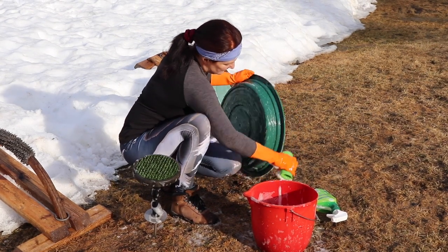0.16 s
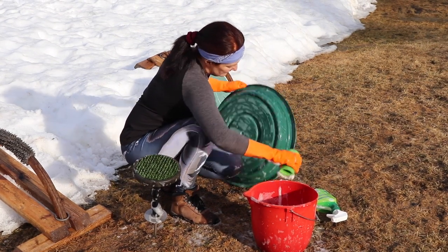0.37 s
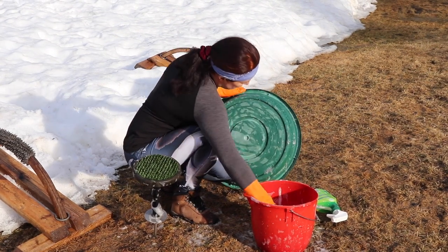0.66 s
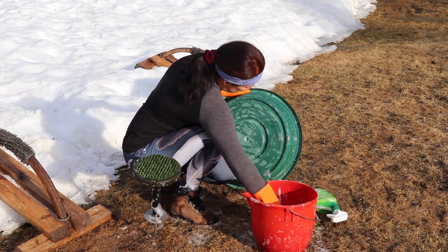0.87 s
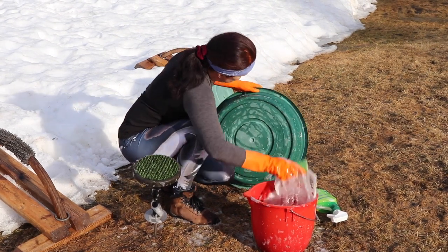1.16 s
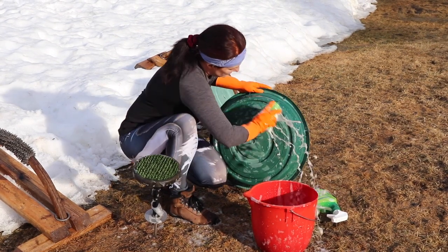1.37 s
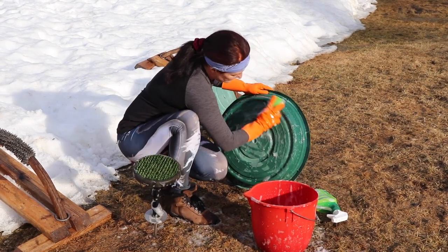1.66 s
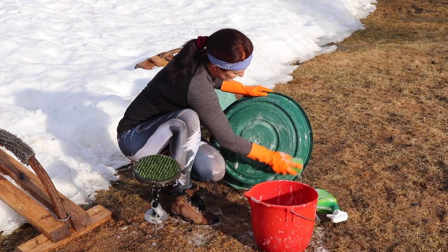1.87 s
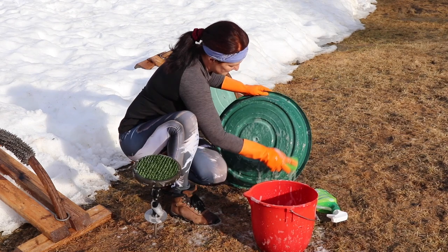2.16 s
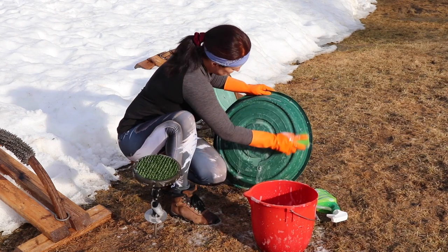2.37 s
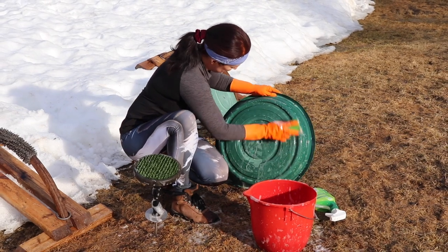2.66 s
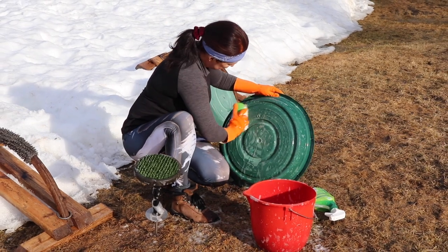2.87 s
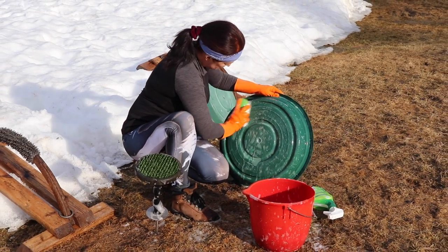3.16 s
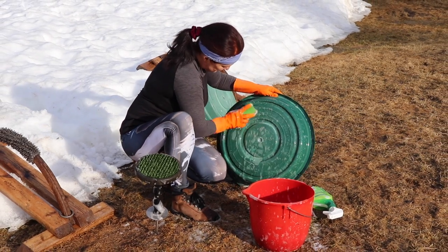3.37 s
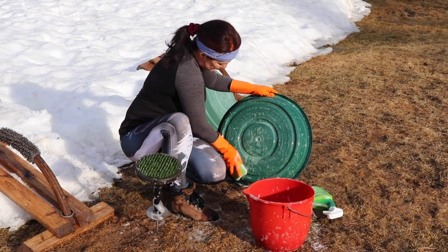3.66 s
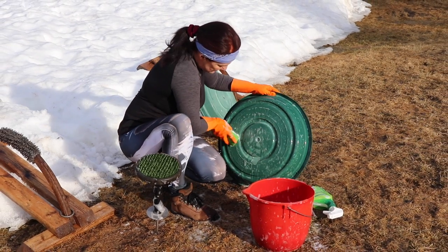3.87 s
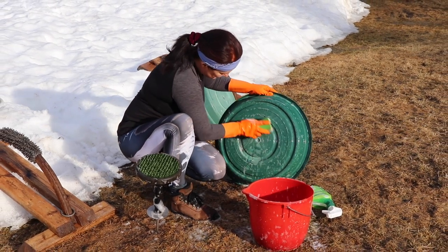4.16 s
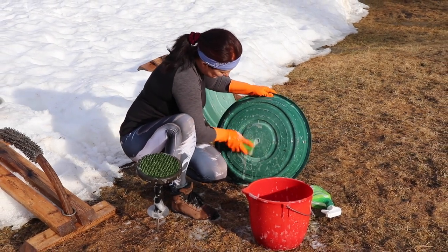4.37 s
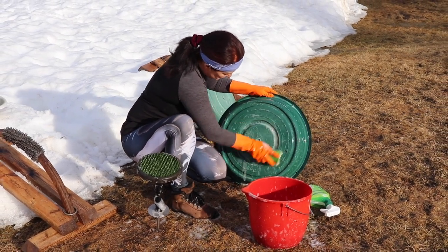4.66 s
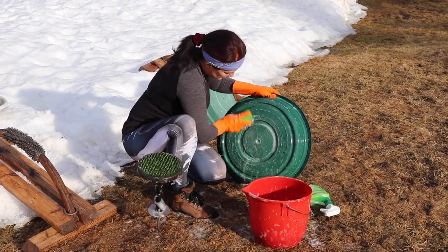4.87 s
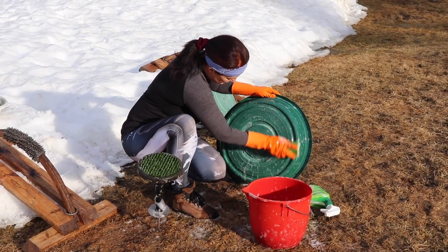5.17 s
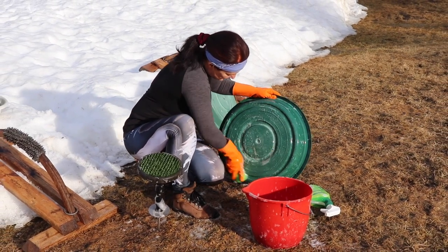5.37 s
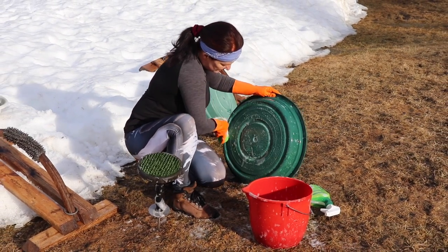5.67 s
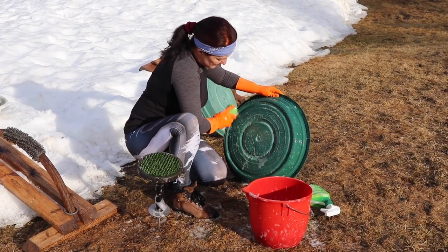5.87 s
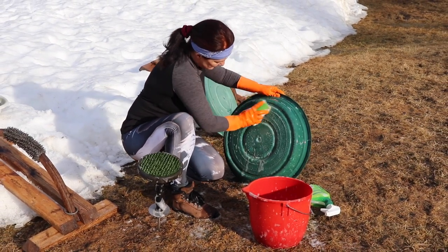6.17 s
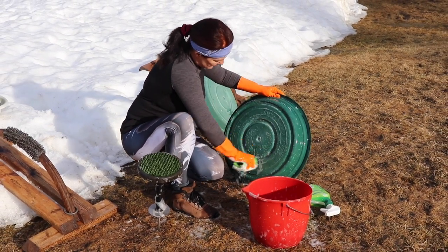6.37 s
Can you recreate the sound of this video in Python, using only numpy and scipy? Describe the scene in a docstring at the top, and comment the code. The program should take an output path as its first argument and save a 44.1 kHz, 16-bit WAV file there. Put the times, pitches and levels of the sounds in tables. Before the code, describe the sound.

A plastic pan scrapes over gritty ground, a scrubber is dunked and lifted streaming from a bucket, then quick bristly strokes rasp and drum outdoors.

```python
"""Scrubbing a plastic pan outdoors

A big pan scrapes round on its rim (grit noise, rim resonances) and settles with knocks (decaying modes).
A scrubber is dunked and lifted out streaming: bubbles, filtered splash grains, low plops and spatters.
Quick strokes follow, grains shaped into bristle rasp and suds hiss, while the pan's modes drum.
A small bird trills twice and others twitter far off in gliding sines; filtered noise makes light wind,
and open-country air with a haze of distant birdsong."""
import sys
import numpy as np
from scipy import signal
from scipy.io import wavfile
from scipy.ndimage import uniform_filter1d

SR = 44100
rng = np.random.default_rng(int(sys.argv[2]) if len(sys.argv) > 2 else 0)


def output_pcm(signal):
    """Save a mono or channel-first signal as 16-bit PCM at the path in sys.argv[1].

    Samples are clipped to [-1, 1] before scaling.
    """
    pcm = np.clip(np.atleast_2d(signal).T, -1, 1) * 32767
    wavfile.write(sys.argv[1], SR, np.round(pcm).astype(np.int16))


N = 287952

# Relative levels colour a layer; levels marked "pre-trim" pass through a fixed gain in their function.

# open-country air, with a haze of distant birdsong near 4.5 kHz: f/Hz, relative level per Hz/dB
AIR_AND_BIRD_HAZE_SPECTRUM = [(59, -43.5), (100, -16.5), (121, -14), (135, -12), (502, -17), (583, -14.5),
                              (662, -19.5), (1170, -16.5), (2860, -25), (4020, -27.5), (4570, -16.5),
                              (5420, -29), (5900, -29), (6420, -31.5), (16000, -37.5)]
# wind rumble on the microphone: f/Hz, relative level per Hz/dB
RUMBLE_SPECTRUM = [(18, -16), (30, -9), (46, -5.5), (72, -7.5), (105, -39)]
# gusts: t/s, length/s, level/dB, top of the rumble f/Hz
GUSTS = [(.52, 0.166, -43, 50), (2.4, .085, -49, 100), (4.68, 0.117, -46.5, 110),
         (5.765, 0.105, -35.5, 110), (6.039, 0.168, -40, 80), (6.169, 0.148, -31.5, 90),
         (6.3, 0.213, -44.5, 90)]
# gust envelope: attack/s, growth from start to end/dB, arch in the middle/dB, release/s
GUST_SHAPE = (.02, -3.5, 1.5, .05)
AIR_AND_BIRD_HAZE_DB, BREEZE_DB = -53.5, -57

# one syllable, a flick and then a rising whistle: t from its middle/s, f/Hz, relative level/dB
SYLLABLE = [(-.032, 4000, -35), (-.03, 4400, -8), (-.026, 5500, -6), (-.0245, 5800, -10),
            (-.0235, 5900, -45), (-.0225, 3450, -40), (-.02, 3650, -15), (-.009, 4200, -8),
            (-.002, 4500, 0), (.008, 4830, 0), (.015, 5100, -5), (.02, 4850, -13), (.024, 4700, -35)]
# near bird's trills: t/s, length/s, first gap between syllables/s, loudest t/s, level/dB
TRILLS = [(0.121, 1.8, .0677, .92, -42.5), (5.668, .45, .0700, 5.588, -41.5)]
# further bird's downward slurs: t/s, starting f/Hz, final f/Hz, level/dB
SLURS = [(2.275, 5900, 5370, -54), (5.902, 5200, 3700, -49.5), (5.963, 6200, 5670, -61.5),
         (6.038, 6100, 5640, -63.5), (6.108, 5000, 3460, -57), (6.116, 6000, 5500, -68)]
TRILL_SLOWS_S = .00036  # added to each gap in turn
TRILL_ARCH_DB_PER_S2 = 16.5  # the level falls away either side of the loudest moment

# splash of stirred water: f/Hz, relative level per Hz/dB
SPLASH_SPECTRUM = [(210, -45), (350, -0.5), (455, -9.5), (834, -4), (1530, -7.5), (2010, -8), (3600, -20.5),
                   (4680, -54), (7920, -120)]
# fine spray: f/Hz, relative level per Hz/dB
SPRAY_SPECTRUM = [(2000, -2.5), (3500, -0.5), (6000, -6.5), (9000, -11.5), (15500, -17.5)]
# stirring in the bucket, then streaming back: t/s, level/dB
FLOW = [(.12, -53.5), (.25, -70.5), (.42, -61.5), (.56, -48.5), (.66, -65.5), (.9, -52.5), (1.2, -43.5),
        (1.4, -49), (1.66, -45.5)]
# water squeezed or flung from the scrubber: t/s, length/s, level/dB
SPRAYS = [(.27, .21, -55), (.48, .09, -50), (.72, 0.088, -58), (1.53, .14, -47)]
# spray envelope: attack/s, growth from start to end/dB, arch in the middle/dB, release/s
SPRAY_SHAPE = (.02, -1.2, 1.5, .04)
# plops and bumps in the bucket: t/s, pre-trim level/dB, f/Hz, splash level/dB
PLOPS = [(0.521, -31, 280, -42), (0.82, -29.5, 335.6, -35), (0.859, -32, 315, -52),
         (0.974, -36.5, 327, -40), (1.196, -17, 281.6, -31.5), (1.249, -28.5, 279, -37.5),
         (1.345, -28.5, 321.2, -32), (1.392, -35.5, 344, -37), (1.452, -39, 338, -48.5),
         (1.493, -36, 326.5, -42), (1.531, -29, 234, -57)]
# wet spatters and drops: t/s, pre-trim smack level/dB, pre-trim fizz level/dB, starting drop f/Hz
SPATTERS = [(0.4799, -39, -55.5, 1450), (0.52, -33.5, -40, 1338), (0.5259, -37.5, -32, 1710),
            (0.5687, -43, -50.5, 3284), (0.7403, -50, -63.5, 1050), (0.9781, -40.5, -59, 1520),
            (1.005, -51, -61, 1045), (1.156, -34, -66, 1900), (1.2306, -40, -55, 1140),
            (1.3059, -39, -59, 1227), (1.329, -39, -43, 1036), (1.4674, -36, -35.5, 2036),
            (1.5291, -42, -39.5, 1550), (1.596, -37.5, -42, 3900), (1.618, -32, -30, 2460),
            (2.226, -55, -49, 3800), (2.259, -56, -49, 4200), (2.412, -37, -33, 2400),
            (2.423, -40, -36, 1300)]
GURGLE_DB, GURGLE_DB_PER_FLOW_DB = -42.5, 1.4  # bucket's hollow at full flow, and how it follows the flow
MIST_DB = -12.5  # fine spray against the splash

# body of the pan: f/Hz, relative level/dB, t60/s
PAN_MODES = [(96.2, -1.5, 0.105), (116.6, -7, 0.157), (137.1, -4.5, 0.149), (176.1, -1, 0.0696),
             (208.77, -3.5, 0.1814), (256, -4.5, 0.0713), (288.75, -3.5, 0.1113), (339.1, -3, 0.054),
             (394.3, -5, 0.101), (516, 2.5, 0.0365)]
# stiff rim and ribs of the pan: f/Hz, relative level/dB, t60/s
RIM_MODES = [(619.8, -4, 0.04), (844, -1, 0.058), (1006, -2.5, 0.0158), (1077, -1.5, 0.0616),
             (1240, 2.5, 0.0242), (1757, 0.5, 0.026), (2434, 4, 0.0177), (2687, -8, 0.065),
             (2839, 0.5, 0.0595), (3184, -8.5, .04), (3936, 3.5, 0.0135)]
# rim dragged over gritty ground: t/s, pre-trim level/dB
DRAG = [(0, -18), (.012, -21.5), (.02, -24.5), (.038, -19), (.049, -28), (.056, -26), (.07, -50),
        (.11, -52), (.15, -54.5)]
# gritty scrape: f/Hz, relative level per Hz/dB
GRIT_SPECTRUM = [(210, -54), (350, -25), (523, 2), (601, -9.5), (1260, -2.5), (1540, -28.5), (1660, -24.5),
                 (2100, -7), (2520, -12.5), (3040, -11.5), (4330, -21.5), (5990, -36.5), (14000, -43)]
# blows on the pan: t/s, pre-trim thud level/dB, thud f/Hz, pre-trim slap level/dB
KNOCKS = [(0.026, -12, 215.4, -38), (0.074, -15.5, 190, -30.5), (2.07, -28.5, 250, -60.5),
          (2.412, -19, 156.8, -27.5), (2.423, -26, 202.4, -30), (2.476, -20, 213, -45),
          (2.721, -15, 280, -36), (2.78, -14, 255, -32), (2.8, -17, 262, -42), (2.877, -26.5, 212, -40.5),
          (3.222, -23, 283, -39), (3.386, -38, 172, -29), (3.749, -14.5, 260, -27.5), (3.78, -20, 290, -36),
          (4.141, -24.5, 205, -33), (4.354, -18.5, 269.4, -35.5), (4.425, -18.5, 191.8, -31.5),
          (4.553, -23, 164, -43), (4.716, -20, 117, -28), (4.728, -21, 101, -37.5),
          (4.923, -35.5, 102, -30.5), (4.973, -15.5, 182.5, -32.5), (4.995, -17, 191.8, -27.5),
          (5.311, -24.5, 207, -33.5), (5.394, -20.5, 223, -28.5), (6.186, -26, 173, -35),
          (6.313, -15, 183, -43.5)]

# bristle rasp: f/Hz, relative level per Hz/dB
RASP_SPECTRUM = [(240, -11.5), (400, -6.5), (527, -3.5), (782, 1), (1370, -4), (1590, -1.5), (2620, -6),
                 (4390, -3), (5990, -21), (7000, -18.5), (9100, -48), (15400, -120)]
# suds hiss: f/Hz, relative level per Hz/dB
SUDS_SPECTRUM = [(1650, -18.5), (2800, -9.5), (4400, -1.5), (5980, -7.5), (8300, -5), (11000, -16.5),
                 (12900, -1), (15100, -17.5), (16000, -22)]
# scrubber strokes: t/s, length/s, pre-trim rasp, suds and drumming level/dB each, rasp colour f/Hz, drumming f/Hz
STROKES = [(1.64, 0.208, -35, -45, -38.5, 1362, 248), (1.692, 0.3427, -37.5, -40.5, -55, 1600, 221),
           (1.919, 0.2706, -42.5, -45, -42.5, 1800, 278), (2.455, 0.103, -31.5, -36.5, -31, 1190, 217),
           (2.473, 0.1666, -43, -40.5, -43, 1380, 212), (2.6, 0.24, -44.5, -45, -42.5, 1190, 291),
           (2.707, 0.1917, -31, -45.5, -28.5, 1050, 265), (2.774, 0.1947, -34, -39.5, -36.0, 1070, 241),
           (2.865, 0.205, -38.5, -39.5, -43, 1330, 249), (3.044, 0.178, -33, -34.5, -33, 1620, 196),
           (3.193, 0.188, -35, -36.5, -35.5, 1210, 247), (3.36, 0.1359, -30, -34.5, -29, 1500, 223),
           (3.469, 0.222, -36.5, -40, -33.5, 1380, 228), (3.557, 0.215, -31, -38, -35, 1520, 219.5),
           (3.692, 0.2004, -34.5, -39.1, -28, 1400, 273.5), (3.827, 0.1957, -38.5, -39.5, -35, 1780, 254),
           (3.971, 0.1924, -33, -40, -35.5, 1506, 238.4), (4.089, 0.18, -35, -43, -37, 1120, 207),
           (4.198, 0.197, -35.5, -42.5, -37, 1090, 177), (4.284, 0.1978, -31.5, -39.5, -35, 1330, 278),
           (4.404, 0.2104, -37.5, -42.5, -39, 1204, 216), (4.515, 0.2464, -33, -39, -33.0, 1250, 210),
           (4.654, 0.17, -34.5, -44.5, -32.5, 1053, 195), (4.718, 0.2334, -36.5, -40, -33, 1335, 230),
           (4.899, 0.302, -36.5, -41.5, -35, 1250, 184), (5.07, 0.2587, -34.5, -40.5, -39.5, 1400, 216),
           (5.234, 0.222, -38.0, -39.0, -39.5, 1460, 254), (5.342, 0.2997, -37.5, -42, -33, 1230, 271.3),
           (5.53, 0.25, -36, -44.5, -41.5, 1450, 258.4), (5.676, 0.2074, -42.5, -45.5, -49.5, 1710, 290),
           (6.167, 0.1626, -37.5, -48, -36.5, 1432, 183), (6.263, 0.2344, -33.5, -40, -30.5, 1240, 197),
           (6.403, 0.1102, -27.5, -29.5, -29, 1350, 216)]
# stroke envelopes: attack/s, growth from start to end/dB, arch in the middle/dB, release/s
RASP_SHAPE = (0.0412, 2.52, 0.86, 0.1093)
SUDS_SHAPE = (0.0517, 1.66, 6.5, 0.0925)
DRUM_SHAPE = (0.0038, -0.77, 3, 0.0862)
# wander of the drumming pitch as the scrubber crosses the ribs: spread/octaves, drift rate f/Hz
DRUM_WANDER = (.14, 9.95)
# the bristles sharpen as the suds outweigh the rasp: dB per dB, up to a limit either way
SHARPNESS, SHARPNESS_LIMIT_DB = 0.68, 5.5
SUDS_MARGIN_S = .003  # the suds start this much after the stroke and stop this much before its end

CUTOFF_HZ = 15850


def from_db(db):
    """Decibels to gain."""
    return 10 ** (np.asarray(db) / 20)


def rms_one(x):
    """Scale to unit rms."""
    return x / np.sqrt(np.mean(x ** 2) + 1e-20)


def even_out(x, window):
    """Hold the rms steady over a sliding window of samples."""
    return x / np.sqrt(uniform_filter1d(x ** 2, window) + 1e-12)


def in_time(rows):
    """Each column of a curve at every sample."""
    s, *columns = np.transpose(rows)
    return [np.interp(np.arange(N) / SR, np.sort(s), c) for c in columns]


def during(rows):
    """1 while a curve lasts, 0 elsewhere."""
    t = np.arange(N) / SR
    return (t >= rows[0][0]) & (t < rows[-1][0])


def add(out, s, sound):
    """Mix a short sound in at time s."""
    start = int(np.clip(s * SR, 0, N - 1))
    out[start:start + len(sound)] += sound[:N - start]


def band(x, low_hz, high_hz):
    """Gentle band-pass."""
    edges_hz = [low_hz, min(high_hz, .45 * SR)]
    return signal.sosfilt(signal.butter(2, edges_hz, "band", fs=SR, output="sos"), x)


def drift(rate_hz):
    """Smooth random wander with unit rms, made at a twentieth of the sample rate."""
    r = np.exp(-40 * np.pi * rate_hz / SR)
    noise = rng.standard_normal(N // 20 + 2002)
    slow = signal.lfilter([1], [1, -2 * r, r * r], noise)[2000:]  # drop the filter's start-up
    return np.interp(np.arange(N) / 20, np.arange(len(slow)), rms_one(slow))


def ring(x, hz, t60):
    """Two-pole resonator: a unit click sets a decaying sine of height 1 ringing."""
    r = from_db(-60 / (t60 * SR))
    w = 2 * np.pi * hz / SR
    return signal.lfilter([0, np.sin(w)], [1, -2 * r * np.cos(w), r * r], x + 1e-18)


def grains(per_s, spread_db):
    """Random clicks of uneven size, unit rms."""
    sizes = from_db(spread_db * np.minimum(rng.exponential(1, N), 4))
    return rms_one((rng.random(N) < per_s / SR) * sizes * rng.choice([-1, 1], N))


def grain_pair(per_s, spread_db):
    """Two independent grain streams, to feed alternate bands."""
    return [grains(per_s, spread_db) for _ in range(2)]


def coloured(spectrum, patchy_db, sources=None, shade=None):
    """Third-octave bands that flicker on their own; shade(Hz) adds a moving colour in dB. Unit rms."""
    points_hz, points_db = np.transpose(spectrum)
    sources = rng.standard_normal((2, N)) if sources is None else sources
    edges = 16 * 2 ** (np.arange(32) / 3)
    out = np.zeros(N)
    for k, (low, high) in enumerate(zip(edges, edges[1:])):
        hz = np.sqrt(low * high)
        if points_hz.min() < hz < points_hz.max():
            level_db = np.interp(np.log(hz), np.log(points_hz), points_db) + patchy_db * drift(13.53)
            shade_db = shade(hz) if shade else 0
            out += from_db(level_db + shade_db) * band(sources[k % 2], low, high)
    return rms_one(out)


def burst(low_hz, high_hz, t60):
    """A puff of band-passed noise that dies away."""
    t = np.arange(SR // 5) / SR
    return rms_one(band(rng.standard_normal(len(t)), low_hz, high_hz)) * from_db(-60 * t / t60)


def swells(rows, shape):
    """Gain over time for rows of (s, length s, dB): each rises, arches and dies away; overlaps add in power."""
    attack_s, growth_db, arch_db, release_s = shape
    power = np.zeros(N)
    for s, length_s, db in rows:
        t = np.arange(0, length_s, 1 / SR)
        edges = np.clip(t / attack_s, 0, 1) * np.clip((length_s - t) / release_s, 0, 1)
        along = t / length_s
        level_db = db + growth_db * along - arch_db * (2 * along - 1) ** 2
        add(power, s, (edges * from_db(level_db)) ** 2)
    return np.sqrt(power)


def air_and_bird_haze():
    """Open-country air with a haze of distant birdsong near 4.5 kHz: noise whose bands flicker gently."""
    return from_db(AIR_AND_BIRD_HAZE_DB) * coloured(AIR_AND_BIRD_HAZE_SPECTRUM, patchy_db=2.0)


def wind(rumble_top_hz=105, falls_db_per_octave=15):
    """A breeze whose gusts rumble on the microphone; each gust sets how high the rumble reaches."""
    s, length_s, db, top_hz = np.transpose(GUSTS)
    strength = np.hypot(from_db(BREEZE_DB), swells(zip(s, length_s, db), GUST_SHAPE))
    reach_hz, = in_time(np.transpose([s, top_hz]))

    def above_reach(hz):
        """Treble loss above the gust's reach."""
        return -falls_db_per_octave * np.maximum(np.log2(hz / reach_hz), 0)

    rumble = coloured(RUMBLE_SPECTRUM, patchy_db=0.0, shade=above_reach)
    rumble = signal.sosfilt(signal.butter(4, rumble_top_hz, fs=SR, output="sos"), rumble)
    return strength * even_out(rumble, SR // 10)


def slur(start_hz, end_hz):
    """One short gliding whistle."""
    swell = np.hanning(int(0.02893 * SR))
    pitch_hz = np.linspace(start_hz, end_hz, len(swell))
    return swell * np.sin(2 * np.pi * np.cumsum(pitch_hz) / SR)


def far_birds(far_db=-58.5, count=120):
    """Distant birds: the listed downward slurs, plus random whistles gliding up or down."""
    song = np.zeros(N)
    for s, start_hz, end_hz, level_db in SLURS:
        add(song, s, from_db(level_db) * slur(start_hz, end_hz))
    for when, height, slope in rng.random((count, 3)):
        hz = 4200 + 1300 * height
        glide_hz = 1400 * (slope - .5)
        add(song, when * N / SR, from_db(far_db) * slur(hz - glide_hz, hz + glide_hz))
    return song


def syllables(uneven_db=0.87):
    """Time and level of each syllable: a trill swells, fades and slows a little as it goes."""
    for start, length_s, gap_s, loudest_s, db in TRILLS:
        s = start
        while s < start + length_s:
            yield s, db - TRILL_ARCH_DB_PER_S2 * (s - loudest_s) ** 2 + rng.normal(0, uneven_db)
            s += gap_s
            gap_s += TRILL_SLOWS_S


def near_bird():
    """One bird repeats a whistled syllable: a sine follows its pitch curve, slightly detuned each time."""
    song = np.zeros(N)
    s, pitch_hz, shape_db = np.transpose(SYLLABLE)
    t = np.arange(s[0], s[-1], 1 / SR)
    for middle, level_db in syllables():
        detune = rng.normal(0, 0.00484)
        phase = 2 * np.pi * np.cumsum(np.interp(t, s, pitch_hz) * (1 + detune)) / SR
        add(song, middle + s[0], from_db(level_db + np.interp(t, s, shape_db)) * np.sin(phase))
    return song


def birds(echo_db=-11.5):
    """Near and far birdsong, scattered back by trees as a short decaying noise echo."""
    song = far_birds() + near_bird()
    t = np.arange(SR // 2) / SR
    trees = rng.standard_normal(len(t)) * np.exp(-t / 0.024)
    return song + from_db(echo_db) * signal.fftconvolve(song, trees / np.linalg.norm(trees))[:N]


def water(wash_db=-1.5, bubbles_per_s=7):
    """Stirred water: small bubbles, fine spray and the hollow of the bucket all grow with the flow."""
    flow_db, = in_time(FLOW)
    pitches = np.geomspace(600, 3000, 18)
    # each pitch has its own bubbles, and small high ones die sooner
    bubbles = rms_one(sum(ring(grains(bubbles_per_s, spread_db=1.5), hz, 20 / hz) for hz in pitches))
    wash = coloured(SPLASH_SPECTRUM, patchy_db=2.5, sources=grain_pair(900, spread_db=3.5))
    splash = rms_one(bubbles + from_db(wash_db) * wash)
    spray = coloured(SPRAY_SPECTRUM, patchy_db=2.0, sources=grain_pair(2500, spread_db=3.5))
    high_hollow = ring(grains(200, spread_db=5.0), 329.7, 0.058)
    low_hollow = ring(grains(170, spread_db=2.5), 248, 0.0303)
    gurgle = rms_one(high_hollow + 1.32 * low_hollow)
    gurgle_db = GURGLE_DB + GURGLE_DB_PER_FLOW_DB * (flow_db - flow_db.max())
    stirred = from_db(flow_db) * (splash + from_db(MIST_DB) * spray) + from_db(gurgle_db) * gurgle
    return during(FLOW) * stirred + swells(SPRAYS, SPRAY_SHAPE) * spray


def plops(ring_t60=0.0526, swell_s=0.00224):
    """Pockets of air close in the bucket and ring low, each with a small splash."""
    out = np.zeros(N)
    t = np.arange(SR // 5) / SR
    for s, pocket_db, hz, splash_db in PLOPS:
        envelope = (1 - np.exp(-t / swell_s)) * np.exp(-np.log(1000) * t / ring_t60)
        add(out, s, from_db(pocket_db + 5.5) * np.sin(2 * np.pi * hz * t) * envelope)
        add(out, s + 0.001894, from_db(splash_db) * burst(586, 1273, t60=0.044))
    return out


def spatters(drop_t60=0.024, rise_per_s=8.4):
    """Flung water lands with a smack and a short fizz, and traps a bubble whose pitch rises."""
    out = np.zeros(N)
    t = np.arange(SR // 20) / SR
    for s, smack_db, fizz_db, hz in SPATTERS:
        bubble = np.sin(2 * np.pi * hz * t * (1 + rise_per_s * t)) * np.exp(-np.log(1000) * t / drop_t60)
        add(out, s, from_db(smack_db + 2.5) * bubble)
        add(out, s, from_db(smack_db - 2.5) * burst(1290, 4300, t60=0.049))
        add(out, s, from_db(fizz_db - 2.5) * burst(3900, 10430, t60=0.0213))
    return out


def rim_ringing(force):
    """The rim's sharp resonances answer a force; unit rms."""
    modes = [from_db(db) * ring(force, hz, t60) for hz, db, t60 in RIM_MODES]
    return rms_one(sum((-1) ** k * mode for k, mode in enumerate(modes)))


def rim_drag(ring_db=-2.5):
    """Grit grinds under the rim in coarse jerks and makes it ring."""
    level_db, = in_time(DRAG)
    pressure = during(DRAG) * from_db(level_db - 3.0)
    grit = coloured(GRIT_SPECTRUM, patchy_db=1.0, sources=grain_pair(3500, spread_db=2.0))
    return pressure * (grit + from_db(ring_db) * rim_ringing(grains(2800, spread_db=1.5)))


def struck(modes):
    """One decaying sine for each mode of a struck part, with the mode frequencies."""
    t = np.arange(SR // 3) / SR
    hz, db, t60 = np.transpose(modes)[:, :, None]
    return hz, from_db(db) * np.sin(2 * np.pi * hz * t) * np.exp(-np.log(1000) * t / t60)


def knocks(focus_octaves=0.092, thud_gain_db=-5.5, slap_gain_db=-2.0, clack_gain_db=-5.0):
    """Each blow wakes the modes that suit its place on the pan; the contact slaps and the rim clacks."""
    out = np.zeros(N)
    mode_hz, body = struck(PAN_MODES)
    _, rim = struck(RIM_MODES)
    signs = rng.choice([-1, 1], (len(KNOCKS), len(rim)))  # random mode signs vary the clacks
    for (s, thud_db, hz, slap_db), sign in zip(KNOCKS, signs):
        thud = np.sum(body / (1 + (np.log2(mode_hz / hz) / focus_octaves) ** 2), axis=0)
        add(out, s + 0.002365, from_db(thud_db + thud_gain_db) * thud / np.abs(thud).max())
        add(out, s, from_db(slap_db + slap_gain_db) * burst(233, 2620, t60=0.0507))
        add(out, s + 0.001916, from_db(slap_db + clack_gain_db) * band(sign @ rim, 356, 1104))
    return out


def pan_body(force, centre_hz, focus_octaves=0.593):
    """The pan's modes answer a force, most of all those near the pitch of the spot that is pressed."""
    octave = np.log2(centre_hz)
    out = np.zeros(N)
    for k, (hz, db, t60) in enumerate(PAN_MODES):
        focus = 1 / (1 + ((np.log2(hz) - octave) / focus_octaves) ** 2)
        out += (-1) ** k * from_db(db) * ring(force, hz, t60) * focus
    return out


def bristle_rasp(colour_hz, sharp_db, colour_db=4.4, colour_octaves=0.45, sharp_hz=2400, ring_db=-11.5):
    """Bristles catch and flick loose by the thousand, and set the rim ringing faintly."""
    octave = np.log2(colour_hz)

    def under_hand(hz):
        """A broad resonance moves with the scrubber's place; a light, quick touch sharpens the rasp."""
        hollow = np.exp(-((np.log2(hz) - octave) / colour_octaves) ** 2)
        return colour_db * hollow + sharp_db / (1 + (sharp_hz / hz) ** 4)

    flicks = grain_pair(3500, spread_db=2.0)
    rasp = coloured(RASP_SPECTRUM, patchy_db=2.28, sources=flicks, shade=under_hand)
    return rasp + from_db(ring_db) * rim_ringing(grains(900, spread_db=2.0))


def suds_hiss():
    """Suds hiss as a dense stream of tiny clicks."""
    return coloured(SUDS_SPECTRUM, patchy_db=2.0, sources=grain_pair(16000, spread_db=1.5))


def pan_drumming(spot_hz):
    """The uneven drag shakes the pan, whose favoured pitch wanders; its level is evened out."""
    octaves, rate_hz = DRUM_WANDER
    shaking = band(grains(400, spread_db=1.5), 86.6, 552)
    return even_out(pan_body(shaking, spot_hz * 2 ** (octaves * drift(rate_hz))), SR // 20)


def scrubbing(chatter_db=.55, judder_db=1.6, rasp_gain_db=-1.6432, suds_gain_db=0.63, drum_gain_db=-3.5):
    """Each stroke drives bristle rasp, suds hiss and the drumming of the pan with its own swells."""
    s, length_s, rasp_db, suds_db, drum_db, stroke_hz, spot_hz = np.transpose(STROKES)
    lightness_db = suds_db - rasp_db
    edge_db = SHARPNESS * (lightness_db - lightness_db.mean())
    edge_db = np.clip(edge_db, -SHARPNESS_LIMIT_DB, SHARPNESS_LIMIT_DB)
    middle_s = s + (length_s + RASP_SHAPE[0]) / 2
    colour_hz, drum_hz, sharp_db = in_time(np.transpose([middle_s, stroke_hz, spot_hz, edge_db]))
    catch_db = chatter_db * drift(60)  # the whole scrubber sticks and slips
    rasp_swell = swells(zip(s, length_s, rasp_db), RASP_SHAPE)
    suds_swell = swells(zip(s + SUDS_MARGIN_S, length_s - 2 * SUDS_MARGIN_S, suds_db), SUDS_SHAPE)
    drum_swell = swells(zip(s, length_s, drum_db), DRUM_SHAPE)
    rasp = bristle_rasp(colour_hz, sharp_db) * rasp_swell * from_db(rasp_gain_db + catch_db)
    suds = suds_hiss() * suds_swell * from_db(suds_gain_db + catch_db)
    drum = pan_drumming(drum_hz) * drum_swell * from_db(drum_gain_db + judder_db * drift(11))
    return rasp + suds + drum


def scene():
    """Everything lies straight ahead, alike in both channels."""
    background = air_and_bird_haze() + wind() + birds()
    bucket = water() + plops() + spatters()
    pan = rim_drag() + knocks() + scrubbing()
    mid = background + bucket + pan
    return np.array([mid, mid])


def record(dry, self_noise_db=-84.0):
    """Each channel adds a faint hiss of its own; the top is cut steeply."""
    noisy = dry + from_db(self_noise_db) * rng.standard_normal(dry.shape)
    return signal.sosfilt(signal.ellip(12, .1, 80, CUTOFF_HZ, fs=SR, output="sos"), noisy)


dry = scene()
out = record(dry)
output_pcm(out)
```